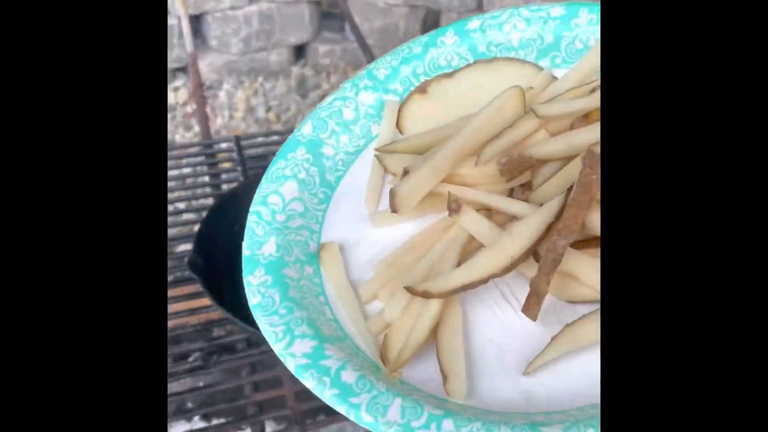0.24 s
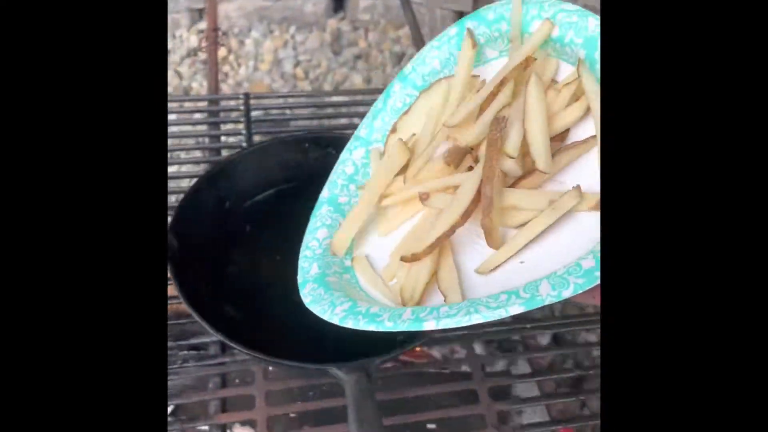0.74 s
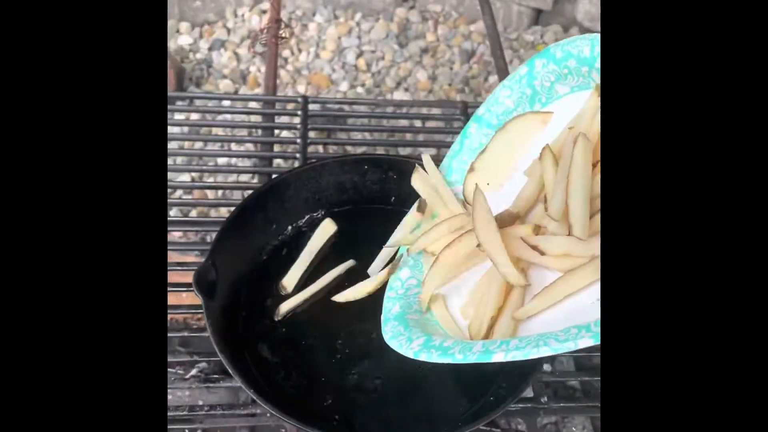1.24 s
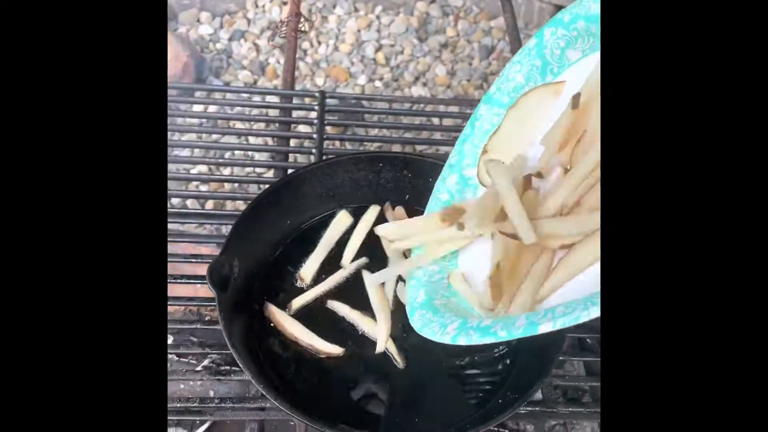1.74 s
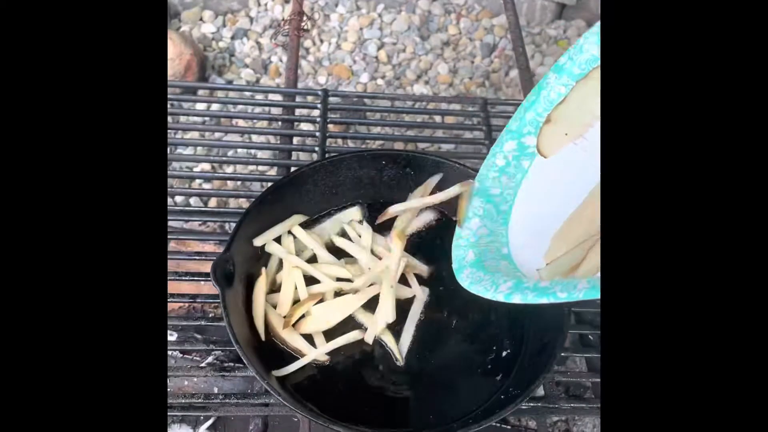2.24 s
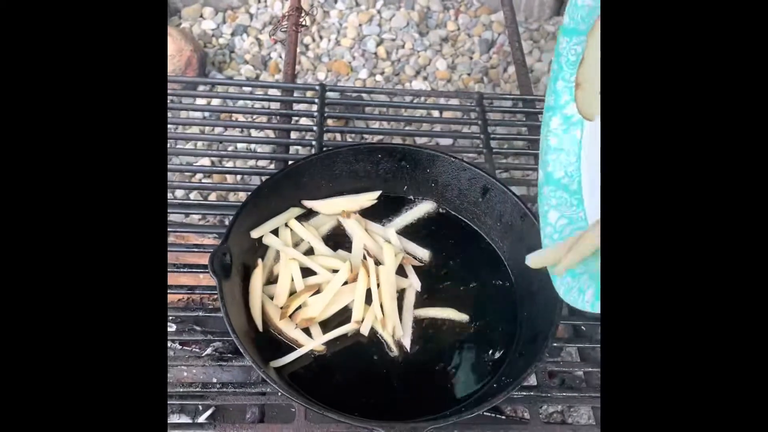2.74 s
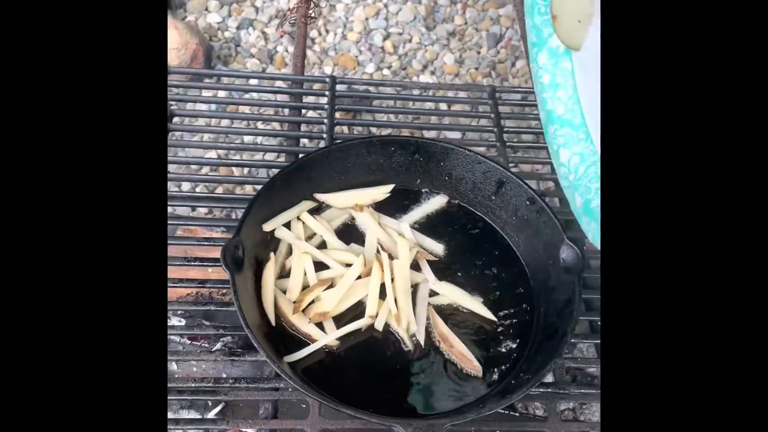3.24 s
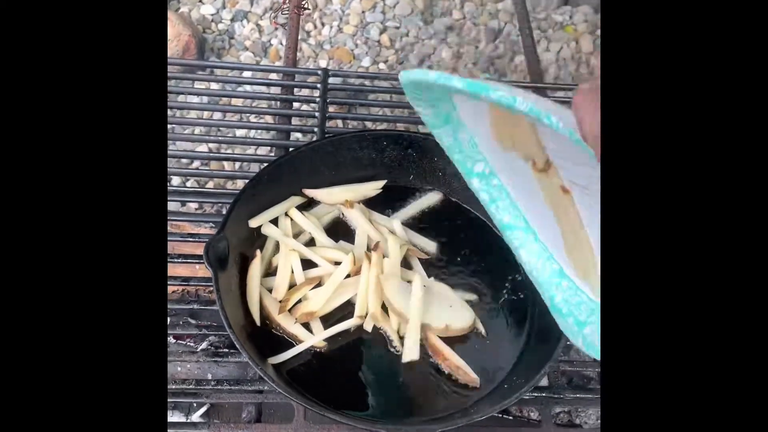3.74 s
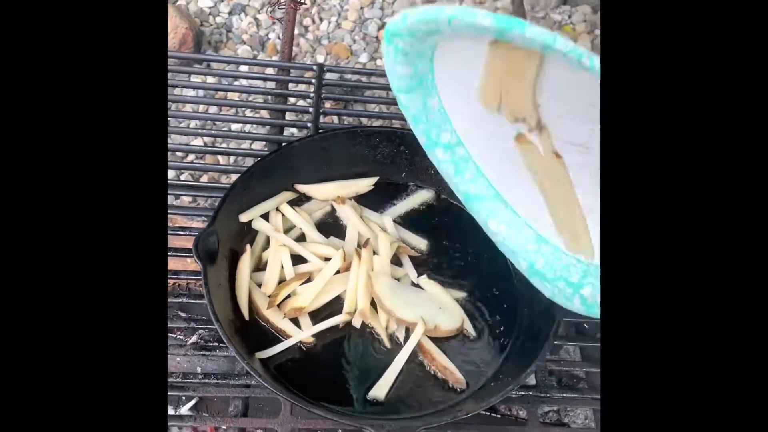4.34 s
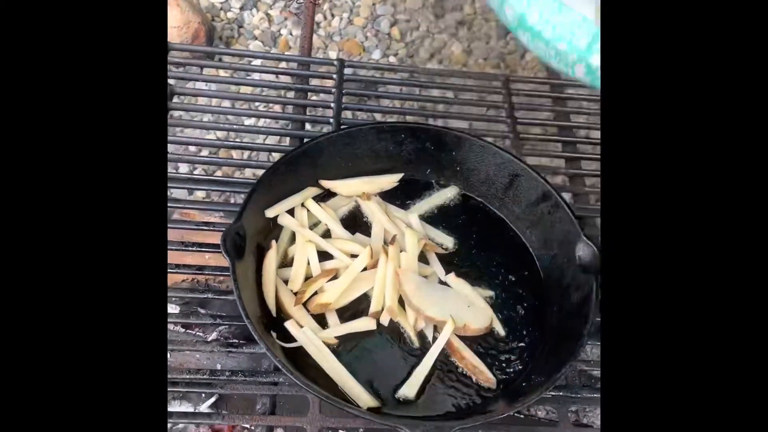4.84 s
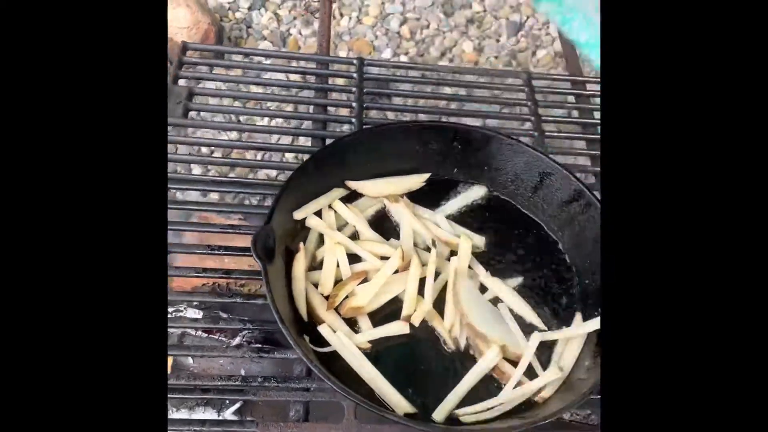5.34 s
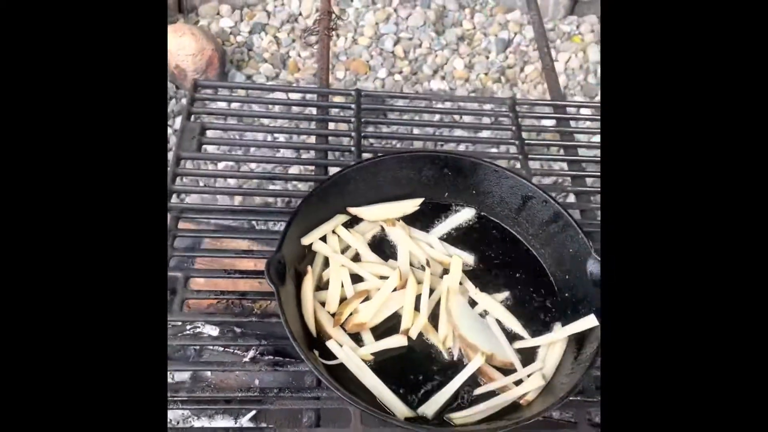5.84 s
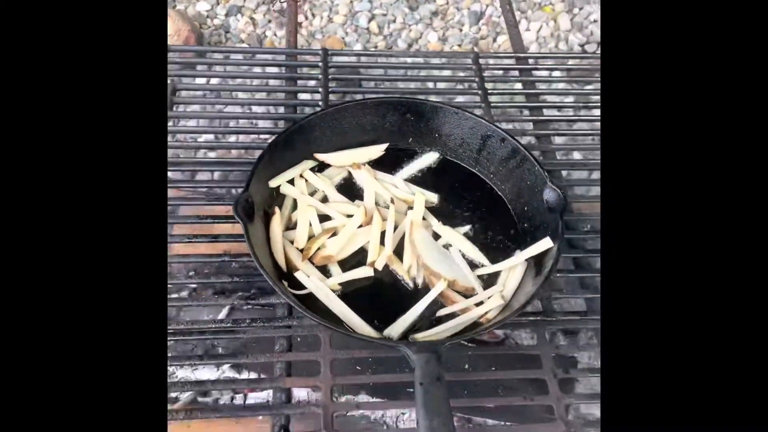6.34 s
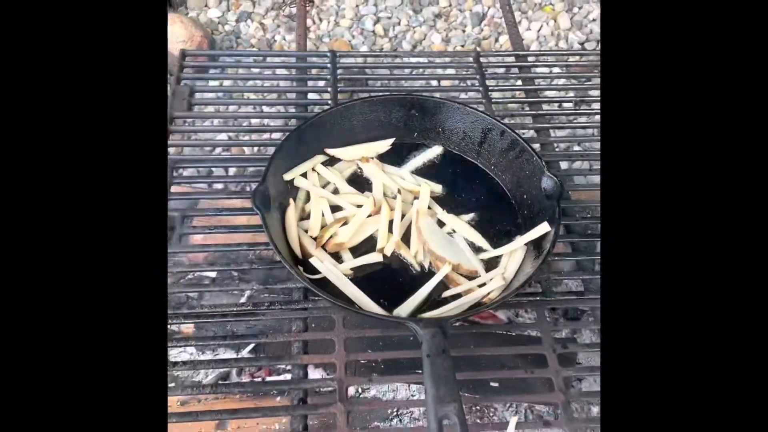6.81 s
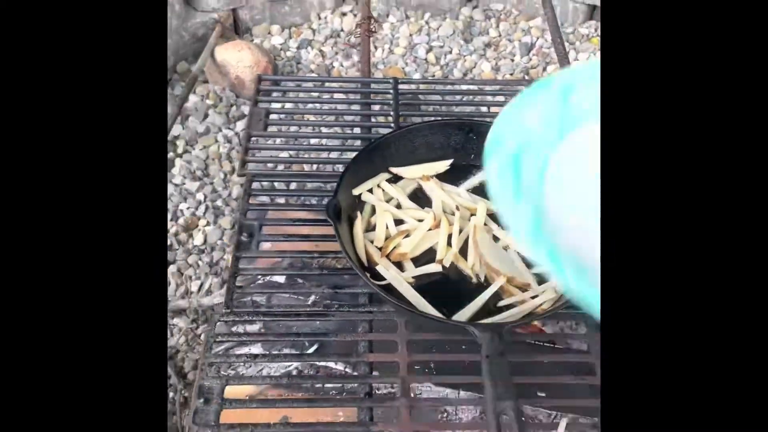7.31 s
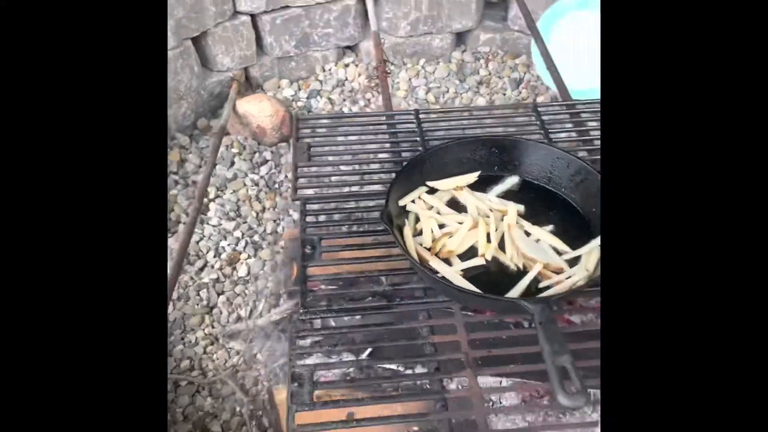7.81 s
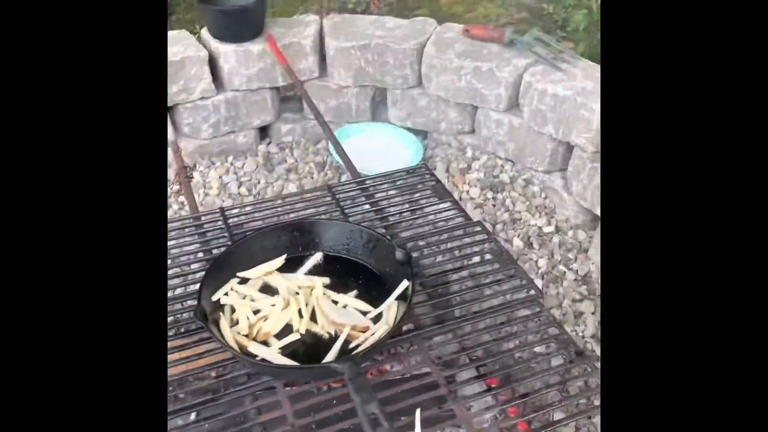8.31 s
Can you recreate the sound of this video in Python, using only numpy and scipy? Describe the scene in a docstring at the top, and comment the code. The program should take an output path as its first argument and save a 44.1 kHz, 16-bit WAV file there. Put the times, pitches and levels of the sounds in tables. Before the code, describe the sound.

Close sizzling and popping oil as damp fries tumble into a pan, followed by sharp plate knocks, faint wind and a distant engine drone.

```python
"""Fries into hot campfire oil

Raw fries slide off a paper plate into an iron skillet, outdoors; the oil spits, then sizzles densely.
The plate is tapped to free the last fries, knocks the pan and is tossed aside.
Oil is built from random bubble bursts, knocks from clicks, chirps and rattles, pats and scrapes from noise.
A far engine of three tones drones, and filtered noise makes the wind on a close two-port microphone."""
import sys
import numpy as np
from scipy import signal
from scipy.fft import rfft, irfft, next_fast_len
from scipy.io import wavfile
from scipy.ndimage import uniform_filter1d

SR = 44100
rng = np.random.default_rng(int(sys.argv[2]) if len(sys.argv) > 2 else 0)


def master(y):
    """Save y as 16-bit WAV."""
    cut = np.clip(np.atleast_2d(y).T, -1, 1)
    pcm = np.round(cut * 32767)  # scale
    wavfile.write(sys.argv[1], SR, pcm.astype(np.int16))


N = 377844
TIME = np.arange(N) / SR


def amp(db):
    """Decibels to gain."""
    return 10 ** (np.asarray(db) / 20)


def decibels(power):
    """Power to decibels."""
    return 10 * np.log10(power + 1e-20)


def evened(x):
    """Scaled to rms 1."""
    return x / np.sqrt(np.mean(x ** 2) + 1e-20)


def peaked(x):
    """Scaled to peak 1."""
    return x / (abs(x).max() + 1e-20)


def read(points, hz):
    """A spectrum joined by straight lines over log frequency."""
    f, value = np.transpose(points)
    return np.interp(np.log(hz + 1), np.log(f + 1), value)


def follow(rows):
    """Each column of a curve at every sample."""
    s, *columns = np.transpose(rows)
    return [np.interp(TIME, s, column) for column in columns]


def since(s):
    """Seconds since time s, zero before it."""
    return np.maximum(TIME - s, 0)


def add(mix, s, sound):
    """Mixes a sound in at time s."""
    part = mix[max(round(s * SR), 0):][:len(sound)]
    part += sound[:len(part)]


def impulse(spectrum, tilt_db=0, size=4096):
    """The causal click that has this spectrum, tilted in dB per octave."""
    hz = abs(np.fft.fftfreq(size, 1 / SR))
    gain_db = read(spectrum, hz) + tilt_db * np.log2(hz / 1000 + .5)
    log_gain = np.log(amp(gain_db))
    # the Hilbert transform gives the phase that starts the click at once
    return np.fft.ifft(np.exp(np.conj(signal.hilbert(log_gain)))).real


def coloured(x, spectrum, tilt_db=0):
    """A sound passed through a spectrum, at rms 1."""
    return evened(signal.oaconvolve(x, impulse(spectrum, tilt_db))[:len(x)])


def band(hz):
    """The broad spectrum of damp things meeting, strongest at hz."""
    return [(hz / 10, -30), (hz / 2.0, -11), (hz, 0), (hz * 1.39, -9), (hz * 10, -32)]


def drift(rate_hz):
    """Random wandering of rms 1, which fades out above rate_hz."""
    size = next_fast_len(N)
    hz = np.fft.rfftfreq(size, 1 / SR)
    return evened(irfft(rfft(rng.standard_normal(size)) / (1 + (hz / rate_hz) ** 2), size)[:N])


def swell(u):
    """A short smooth rise and fall that reaches 1 at u = 1."""
    return (u * np.exp(1 - u)) ** 2


def bend(t, hz, steep):
    """Bending wave, high pitches first: a falling chirp, loudest at hz; less steep ends fall deeper."""
    cycles = 2.08  # the peak comes this many periods of hz after the blow
    u = t * hz / cycles
    envelope = u ** 2 * np.exp(2 * (1 - u ** steep) / steep)
    return envelope * np.sin(2 * np.pi * cycles * 4 * u / (1 + u))


# The far engine's three tones fade in and out on the way.
# Each row: time in seconds, then the level of the first, second and third tone in dB.
ENGINE_TONES = [(0, -56.5, -60, -63), (.4, -47, -54.5, -62.5), (1.2, -46.5, -58, -60),
                (1.8, -44, -65, -76.5), (2.7, -40.5, -57, -73), (4, -40.5, -55.5, -62),
                (5, -40.5, -68, -104), (6, -45, -52, -81), (6.8, -46.5, -55.5, -82), (7.5, -46, -67, -102),
                (8.57, -49, -64, -64)]
# The engine slowly sags. Each row: time in seconds, firing rate in Hz.
ENGINE_RATE = [(0, 76.9), (1.3, 76.4), (2.8, 75.2), (3.8, 75.7), (5, 74.9), (6.7, 74.3), (8.57, 73.4)]


def engine():
    """A far drone: three multiples of the firing rate that waver on their way through the air."""
    waver_db, waver_hz = 1.3, 2.2
    hz, = follow(ENGINE_RATE)
    turns = np.cumsum(hz + 0.15 * drift(1.44)) / SR
    out = np.zeros(N)
    for multiple, db in enumerate(follow(ENGINE_TONES), 1):
        out += amp(db + waver_db * drift(waver_hz)) * np.sin(2 * np.pi * multiple * turns)
    return np.sqrt(2) * out


# Gusts on the microphone. Each row: middle in seconds, length in seconds, level in dB before a trim.
GUSTS = [(1.937, 2.3, -52.5), (3.314, 0.4, -49), (4.333, 0.59, -40), (4.887, 0.48, -45), (5.435, 0.31, -44),
         (7.194, 1.4, -49), (8.375, 0.11, -44)]


def breeze():
    """Wind level in dB: smooth gusts over a light breeze, all of it lumpy with turbulence."""
    breeze_db, rise_s = -51.5, 0.64  # the light wind between gusts takes a while to get up
    lumps_db, lumps_hz = 2.5, 13
    steady = amp(breeze_db) * (1 - np.exp(-TIME / rise_s))
    gusts = [amp(db) * np.exp(-(2 * (TIME - s) / length) ** 2) for s, length, db in GUSTS]
    return decibels(steady ** 2 + np.square(gusts).sum(0)) + lumps_db * drift(lumps_hz)


# Tone of the wind, then of the yard. Each row: frequency in Hz, relative strength in dB.
WIND_TONE = [(15, -77), (25, -56), (37, 2), (60, 5.5), (80, 7), (110, -1.5), (180, -17.5), (300, -27),
             (600, -38.5), (2000, -67)]
YARD_TONE = [(20, -29), (40, 2.5), (120, 6.5), (220, 1), (350, -3.5), (800, -10.5), (2000, -17),
             (5000, -23.5), (15000, -101)]
# How loud the part of the yard shared by both ports is. Each row: time in seconds, level in dB.
YARD_LEVEL = [(0, -59.5), (1.5, -57.5), (4, -57), (7, -59.5), (7.5, -68.5), (7.9, -55), (8.57, -61.5)]


def air():
    """Wind rumble and the hush of the yard: filtered noise, partly shared by the two ports."""
    gust_db = breeze()
    yard_db, = follow(YARD_LEVEL)
    # first a shared noise, then one for each port
    wind = np.array([coloured(rng.standard_normal(N), WIND_TONE) for _ in range(3)])
    yard = np.array([coloured(rng.standard_normal(N), YARD_TONE) for _ in range(3)])
    wind_sound = amp(gust_db + 1.0) * (wind[0] + 0.99 * wind[1:])
    return wind_sound + amp(yard_db) * (yard[0] + 1.13 * yard[1:])


# Low thumps: handling of the microphone, and the deep end of the hardest plate blow.
# Each row: start in seconds, peak level in dB.
THUMPS = [(3.111, -30), (5.124, -24), (6.451, -28), (6.657, -29.5), (8.365, -21.5)]


def thumps():
    """Handling of the microphone, and the hardest plate blow's deep end: a few low, damped cycles."""
    out, t = np.zeros(N), TIME[:8000]
    thump = peaked(t * np.exp(-t / 0.009) * np.sin(2 * np.pi * 62 * t))
    for s, db in THUMPS:
        add(out, s, amp(db) * thump)
    return out


# Blows that ring the skillet. Each row: start in seconds, level in dB before a trim.
CLANGS = [(1.035, -43.5), (1.26, -52), (1.319, -39.5), (1.371, -43), (1.405, -48.5), (2.071, -47),
          (2.886, -31.5), (5.36, -44)]
# The skillet's own tones. Each row: pitch in Hz, relative level in dB, seconds to fall by 60 dB.
IRON_TONES = [(686, 5, 0.19), (1266, 5, 0.12), (1982, 5.5, 0.085), (3000, 5.5, 0.057)]
# Single lingering rings of grate bars and, near 1.28 kHz, of the skillet.
# Each row: start in seconds, level in dB, pitch in Hz, seconds to fall by 60 dB.
SINGLE_RINGS = [(4.081, -35, 2790, 0.28), (4.266, -46, 2440, 0.79), (4.266, -40, 2760, 0.61),
                (4.08, -40, 4743, 0.25), (4.268, -46, 4640, 0.54), (4.265, -40, 5130, 0.32),
                (5.122, -54.5, 1057, 3.4), (5.139, -32.5, 1290, 0.15), (5.139, -35, 1272, 0.11)]


def skillet(boil, spit, load):
    """Oil-damped cast iron rings under blows and hums under bubbles; single rings linger, some of the grate."""
    out, t = np.zeros(N), TIME[:SR]
    ring = peaked(sum(amp(db - 60 * t / t60) * np.sin(2 * np.pi * hz * t) for hz, db, t60 in IRON_TONES))
    for s, db in CLANGS:
        add(out, s, amp(db + 7.5) * ring)
    for s, db, hz, t60 in SINGLE_RINGS:
        add(out, s, amp(db - 60 * t / t60) * np.sin(2 * np.pi * hz * t))
    hum_db = 3.5 + decibels(boil + amp(-6.5) ** 2 * spit)
    damping = 1 + load / amp(-56.5) ** 2  # a load of -56.5 dB halves the hum
    hum = signal.oaconvolve(rng.standard_normal(N), ring * np.exp(-t / 0.035))[:N]
    return out + amp(hum_db) / damping * evened(hum)


# Blows on the plate. Each row: start in seconds, crack peak in dB, crack and rattle tilt in dB per octave,
# snap pitch in Hz, snap peak in dB, bending wave pitch in Hz, bending wave level in dB,
# how steeply that wave ends, flex pitch in Hz, flex level in dB, rattle peak in dB, rattle decay in seconds.
KNOCKS = [(3.7033, -38, 0, 2450, -17.5, 720, -29, 0.98, 404, -36, -20, 0.015),
          (3.8925, -31, -2, 2350, -23, 693, -31.5, 0.89, 435, -28, -19, 0.013),
          (4.0806, -5.5, 0.5, 2550, -10, 905, -28.5, 0.76, 412, -28.5, -16, 0.02),
          (4.2677, -3, 0, 4570, -11.5, 920, -33, 1.7, 420, -28, -15.5, 0.02),
          (4.4468, -6.5, -2, 4630, -4.5, 760, -24, 1.4, 396, -31, -13.5, 0.019),
          (4.504, -38, -3.5, 1500, -39, 714, -32, 2, 510, -34, -27.5, 0.013),
          (5.1206, -6.5, 5.5, 2300, -11, 895, 1, 4.5, 792, -6, -11, 0.0086),
          (5.125, -6.5, -6, 2520, 1, 1040, -9, 4.1, 166, -19, 1, 0.0031),
          (7.7194, -29, -1, 2360, -25.5, 512, -22, 0.59, 214.4, -24.5, -24.5, 0.023)]
# Tone of the crack and the rattle. Each row: frequency in Hz, relative strength in dB.
CRACK_TONE = [(100, 2.5), (330, 0), (480, -17), (620, 7), (850, 1.5), (1100, -19), (1700, 2), (2300, 3),
              (3000, 4.5), (4600, 3), (7000, 2), (10000, -15.5), (16000, -17.5)]
# Ways the plate flexes. Each row: multiple of the flex pitch, relative level in dB.
FLEX_TONES = [(1.002, 10.5), (1.34, 7.5), (2.05, -2), (3.1, 7), (3.7, -0.5)]


def flexing(t, pitch_hz, decay_s):
    """The damp card wobbles for only a few cycles, so its stiffer flexes die sooner."""
    flex = np.zeros(len(t))
    for multiple, db in FLEX_TONES:
        hz = multiple * pitch_hz
        life_s = min(3 / hz, decay_s)
        flex += amp(db) * np.sin(2 * np.pi * hz * t) * np.exp(-t / life_s)
    flex *= 1 - np.exp(-t / 0.0024)
    u = t / 0.00085  # the whole plate also pushes one low puff of air
    puff = peaked(u * (2 - u) * np.exp(-u))
    return peaked(flex) + amp(-8) * puff


def rattling(t, tilt_db, decay_s):
    """The card rattles unevenly; the bright part dies before the dull part."""
    unevenness = evened(uniform_filter1d(rng.standard_normal(len(t)), size=90))
    rattle = rng.standard_normal(len(t)) * amp(4 * unevenness)
    bright = coloured(rattle * np.exp(-t / decay_s), CRACK_TONE, tilt_db)
    dull = coloured(rattle * np.exp(-t / (1.45 * decay_s)), CRACK_TONE, tilt_db - 3)
    return peaked(bright + .5 * dull)


def plate():
    """Each blow is a crack, a short snap, a falling bending wave, a damped flex and a rattle."""
    out, t = np.zeros(N), TIME[:6000]
    for (s, crack_db, tilt_db, snap_hz, snap_db, bend_hz, bend_db, steep,
         flex_hz, flex_db, rattle_db, decay_s) in KNOCKS:
        crack = 0.34 * rng.standard_normal(len(t)) * np.exp(-t / 0.00095)
        crack[0] = 1
        snap = np.sin(2 * np.pi * snap_hz * t) * swell(t / 0.0003)
        blow = amp(crack_db) * peaked(coloured(crack, CRACK_TONE, tilt_db))
        blow += amp(snap_db) * snap
        blow += amp(bend_db) * bend(t, bend_hz, steep)
        blow += amp(rattle_db) * rattling(t, tilt_db, decay_s)
        blow += amp(flex_db) * flexing(t, flex_hz, decay_s)
        add(out, s, blow)
    return out


# Short squeaks of the card as it shifts in the grip. Each row: start in seconds, length in seconds,
# level in dB before doubling, first pitch in Hz, last pitch in Hz.
RUBS = [(0.055, 0.22, -70, 3140, 2470), (3.721, 0.015, -46.5, 1610, 2510), (3.893, 0.0062, -30, 2440, 2300),
        (3.9, 0.0086, -34.5, 1830, 1750), (8.029, 0.024, -50.5, 2290, 2070)]


def rub():
    """Thin squeaks, rough in pitch, that swell, glide and fade."""
    out, jitter_hz = np.zeros(N), 170 * drift(320)
    for s, length, db, from_hz, to_hz in RUBS:
        now = (TIME >= s) & (TIME < s + length)
        u = (TIME[now] - s) / length
        hz = from_hz + (to_hz - from_hz) * u ** 2 + jitter_hz[now]
        envelope = 2 * np.sqrt(abs(np.sin(np.pi * u)))
        add(out, s, amp(db) * envelope * np.sin(2 * np.pi * np.cumsum(hz) / SR))
    return out


# Dull pats of fries and plate. Each row: start in seconds, level in dB before a trim, pitch in Hz.
TUMBLES = [(0.462, -41.5, 890), (0.714, -28, 1500), (0.805, -38, 950), (0.829, -44, 2500),
           (0.882, -30, 2600), (1.035, -29.5, 1150), (1.066, -30.5, 980), (1.0918, -25.5, 2220),
           (1.487, -39, 730), (1.634, -26.5, 3000), (1.669, -23.5, 1900), (1.681, -26, 1160),
           (1.796, -26, 1240), (1.801, -27, 900), (1.8135, -26, 980), (1.8355, -21, 1210),
           (1.951, -29, 1190), (1.963, -25.5, 1210), (1.9774, -19, 1050), (1.991, -27, 850),
           (2.002, -27, 650), (2.0019, -20.5, 3340), (2.071, -27.5, 1000), (2.513, -32, 850),
           (2.734, -26.5, 490), (3.279, -32, 1170), (3.9066, -28.5, 1950), (4.274, -19.5, 750),
           (4.463, -18, 1720), (4.463, -20, 650), (4.472, -22, 1400), (6.157, -29.5, 710),
           (7.249, -39.5, 750), (7.708, -28, 880), (7.729, -22, 1640), (7.946, -33, 415), (8.057, -31, 463)]
# Scrapes of fries and plate, and rough tails after two plate blows. Each row: middle in seconds,
# length in seconds, level in dB before the fade in and out, strongest frequency in Hz.
SCRAPES = [(0.338, 0.031, -55, 2120), (0.392, 0.15, -51, 600), (0.724, 0.071, -50.5, 2470),
           (0.782, 0.27, -52.5, 870), (1.023, 0.21, -56.5, 1160), (1.682, 0.088, -45, 980),
           (1.815, 0.16, -46.5, 850), (1.807, 0.027, -39, 815), (1.965, 0.13, -51.5, 616),
           (5.153, 0.055, -40, 855), (7.751, 0.035, -44.5, 600), (7.927, 0.045, -48, 2230),
           (8.059, 0.036, -44.5, 1950)]


def pats_and_scrapes():
    """Damp fries and plate pat dully; uneven noise makes their scrapes and two blows' rough tails."""
    out, t = np.zeros(N), TIME[:2048]
    for s, db, hz in TUMBLES:
        settle = peaked(coloured(rng.standard_normal(len(t)) * np.exp(-t / 0.0058), band(hz)))
        add(out, s, amp(db - 8.5) * (bend(t, hz, 1.3) + amp(3.5) * settle))
    rough = rng.standard_normal(N) * amp(3 * drift(120))
    for s, length, db, hz in SCRAPES:
        near = abs(TIME - s) < length
        envelope = np.exp(-(2 * (TIME[near] - s) / length) ** 2)
        add(out, s - length, amp(db) * coloured(rough[near], band(hz)) * envelope)
    return out


# Steam squeezing out under a fry. Each row: start in seconds, peak level in dB, pitch in Hz.
SQUEAKS = [(1.019, -26.5, 8000), (2.053, -26, 5760), (2.123, -21.5, 6200), (3.221, -30, 8800),
           (3.952, -27, 5600), (5.352, -20.5, 5800), (5.731, -23, 5130), (6.976, -21.5, 4900)]


def squeaks():
    """Steam flutters out as noise in a narrow band for a few milliseconds."""
    out, t = np.zeros(N), TIME[:2048]
    for s, db, hz in SQUEAKS:
        puff = rng.standard_normal(len(t)) * np.exp(-t / 0.009)
        ring = np.exp(-t / 0.00029) * np.cos(2 * np.pi * hz * t)
        add(out, s, amp(db) * peaked(signal.fftconvolve(puff, ring)[:len(t)]))
    return out


# Single loud pops of oil.
# Each row: start in seconds, level in dB before a trim, pitch of the bursting bubble in Hz.
POPS = [(1.0977, -21, 5740), (1.1518, -24.5, 9800), (1.237, -17, 10300), (1.2685, -14.5, 9000),
        (1.3292, -15.5, 9400), (1.342, -13, 9700), (1.369, -21, 10000), (1.387, -28, 10600),
        (1.4415, -27, 6200), (1.476, -18, 6340), (1.5633, -25, 10600), (1.8333, -17, 9900),
        (1.9551, -19, 10000), (2.1182, -14.5, 5820), (2.125, -18, 9150), (2.2473, -22, 10200),
        (2.2807, -16.5, 9600), (2.353, -17, 10200), (2.358, -21, 9900), (2.4, -22.5, 10400),
        (2.446, -22, 9600), (2.4903, -23.5, 9400), (3.6458, -22, 5930), (3.8353, -24.5, 9400),
        (4.339, -19.5, 8900), (5.308, -22, 9000), (5.335, -26, 4000), (5.395, -21, 6000),
        (5.351, -30, 6200), (5.4392, -17.5, 9060), (5.5611, -17, 10100), (5.617, -19.5, 9800),
        (5.7312, -25, 3500), (5.8326, -21, 9160), (5.9214, -18.5, 5200), (6.1578, -20, 9700),
        (6.389, -20.5, 9050), (6.5239, -29, 9000), (6.5862, -22, 5860), (6.594, -22, 4080),
        (6.708, -19.5, 5360), (6.9767, -40, 3700), (7.1005, -21.5, 8100), (7.149, -28, 6700)]
# Pops grow duller as the pan fills. Each row: time in seconds, tilt in dB per octave.
POP_TILT = [(1.2, 3.5), (3.6, -4.5), (6.7, -3.5)]
# Tone of snapping droplets. Each row: frequency in Hz, relative strength in dB.
SNAP_TONE = [(300, -24.5), (1000, -18), (4000, -3), (5500, 3), (8000, 8), (11000, 3.5), (13300, 0),
             (15700, 8)]


def pops():
    """A drop of water explodes in one sharp click, a brief bubble ring and a little spray."""
    out, t = np.zeros((2, N)), TIME[:1024]
    lag_s = 0.000025  # pops come from all over the pan, so one port may hear them first
    for s, db, hz in POPS:
        spray = 0.13 * rng.standard_normal(len(t)) * np.exp(-t / 0.0027)
        spray[0] = 1  # the click
        tilt_db = np.interp(s, *np.transpose(POP_TILT))
        ring = np.sin(2 * np.pi * hz * t) * np.exp(-t / 0.00079)
        pop = amp(db + 7.0) * (peaked(coloured(spray, SNAP_TONE, tilt_db)) + 0.25 * ring)
        add(out[0], s, pop)
        add(out[1], s + lag_s * rng.uniform(-1, 1), pop)
    return out


# Handfuls of fries reaching the oil. Each row: start in seconds, boiling they bring in dB,
# spitting of their surface water in dB.
BATCHES = [(0.678, -65, -75), (1.02, -57.5, -70), (1.22, -62, -68), (1.307, -58.5, -39.5),
           (1.768, -50.5, -42.5), (1.979, -61, -39.5), (2.26, -62, -40), (3.65, -58.5, -52),
           (5.311, -52, -38.5)]
# The microphone backs away from the pan. Each row: time in seconds, distance in metres.
DISTANCE = [(0, 0.46), (6.2, 0.41), (7.5, 0.65), (8.57, 0.79)]


def frying():
    """Powers of boiling, flash and spitting at the microphone, and the load of fries in the pan."""
    wet_s = 0.0023  # a fry is wetted this fast
    spit_s, flash_s = 0.065, 0.21  # its surface water spits, then flashes off as fine fizz
    build_s, dry_s = 0.04, 6.54  # boiling builds up and slowly dies away
    linger_db, linger_s = -14.5, 0.79  # droplets thrown into the oil go on spitting
    boil, flash, spit, load = np.zeros((4, N))
    for s, db, spit_db in BATCHES:
        age, amount = since(s), amp(db) ** 2
        wet = 1 - np.exp(-age / wet_s)
        boil += amount * (1 - np.exp(-age / build_s)) * np.exp(-age / dry_s)
        flash += amount * wet * np.exp(-age / flash_s)
        lingering = amp(linger_db) ** 2 * np.exp(-age / linger_s)
        spit += amp(spit_db) ** 2 * wet * (np.exp(-age / spit_s) + lingering)
        load += amount * wet
    metres, = follow(DISTANCE)
    near = (metres[0] / metres) ** 2
    return near * boil, near * flash, near * spit, load


def bursts(per_s, spread_db, cycles, count=8):
    """Bubbles burst at random times and sizes, each a short damped ring at one of a few pitches."""
    t, out = TIME[:512], np.zeros(N)
    size = amp(spread_db * np.minimum(rng.exponential(1, N), 4.5)) * rng.choice([-1, 1], N)
    size *= rng.random(N) < per_s / SR
    kind = rng.integers(0, count, N)
    for k, hz in enumerate(np.linspace(900, 16000, count)):
        ring = np.exp(-t * hz / cycles) * np.cos(2 * np.pi * hz * t)
        out += signal.oaconvolve(size * (kind == k), ring / np.linalg.norm(ring))[:N]
    return out


# Tone of the fine fizz, then of the coarser bubbling. Each row: frequency in Hz, relative strength in dB.
FIZZ_TONE = [(1500, -17.5), (4000, -2.5), (6000, -0.5), (7500, 5.5), (9500, 0.5), (11500, -1), (13300, -5),
             (15700, 3.5)]
BUBBLING_TONE = [(250, -29), (500, -42), (750, -7.5), (1500, -2.5), (2200, 6), (3700, 5), (4500, 2),
                 (5100, 6.5), (6200, 6.5), (8000, -0.5), (13000, -39)]


def oil(boil, flash, spit, load):
    """Fizz and bubbling in flurries, clumped droplet crackle, ringing bubbles; a full pan evens out."""
    idle_db = -74  # the hot oil alone
    fizz_db = decibels(amp(-1.0) ** 2 * boil + amp(3.0) ** 2 * flash + amp(idle_db - 4.0) ** 2)
    bubbling_db = decibels(boil + amp(idle_db) ** 2)
    crackle_db = decibels(spit + amp(-17) ** 2 * boil)
    flurry = drift(8.2)
    # the first few fries sputter; a load of -51.5 dB halves this
    sputter_db = 5.5 / (1 + load / amp(-51.5) ** 2) * (drift(58) - .5)
    flutter_db = 1.5 * drift(35)  # bubbles break out in quick little runs
    clump_db = 3 * drift(48)

    fizz = coloured(bursts(per_s=8300, spread_db=0.0, cycles=0.36), FIZZ_TONE)
    fizz *= amp(fizz_db + 8.0 + 1.15 * flurry + sputter_db)
    bubbling = coloured(bursts(per_s=7000, spread_db=-0.3, cycles=0.31), BUBBLING_TONE)
    bubbling *= amp(bubbling_db - 0.34 + 0.39 * flurry + flutter_db)
    crackle = coloured(bursts(per_s=340, spread_db=2.8, cycles=0.6), SNAP_TONE)
    crackle *= amp(crackle_db + 4.5 + clump_db + sputter_db)
    ringing = coloured(bursts(per_s=260, spread_db=2.6, cycles=2.5), BUBBLING_TONE)
    ringing *= amp(bubbling_db - 7)
    return fizz + bubbling + crackle + ringing


# How the two microphone ports differ in timing.
# Each row: frequency in Hz, angle in radians by which left leads.
PORT_PHASE = [(0, 0), (400, -.1), (1000, -1.1), (1400, 0), (2000, .5), (2900, 2), (4300, 1.7), (4900, -.3),
              (6000, 1.1), (7000, 2.95), (8300, 3.3), (9300, 4.9), (10200, 6.25), (11700, 6.3),
              (12300, 6.8), (13200, 9.15), (14900, 9.6), (15700, 10.5)]
# How they differ in level. Each row: frequency in Hz, left minus right in dB.
PORT_BALANCE = [(330, 1), (600, -8), (1400, -7.5), (2100, -2.5), (3500, -5.5), (4600, -3), (5100, 2.5),
                (6200, 0)]
# Sound that differs between the ports. Each row: frequency in Hz, level in dB before a trim.
SCATTER = [(100, 4), (250, 5.5), (600, 0.5), (2000, -13), (3200, -16.5), (5500, -7), (7500, -66),
           (9500, -44), (11000, -0.5), (13000, -24), (15000, -10.5)]


def ports(spread, fixed):
    """The ports get unlike phase and level; sound from ever new spots differs more between them."""
    size = next_fast_len(N + SR // 4)
    hz = np.fft.rfftfreq(size, 1 / SR)
    side = np.array([[.5], [-.5]])
    direct = rfft(spread + fixed, size) * np.exp(1j * side * np.interp(hz, *np.transpose(PORT_PHASE)))
    wander = np.array([drift(560), drift(420)])
    # plate and pan stay in one spot, so little of their sound scatters
    moving = (spread + 0.25 * fixed) * wander
    scattered = rfft(moving, size) * amp(read(SCATTER, hz) - 1.0)
    return irfft((direct + scattered) * amp(side * read(PORT_BALANCE, hz)), size)[:, :N]


def scene():
    """Pan and plate close by, engine and wind behind."""
    background = engine() + air() + thumps()
    boil, flash, spit, load = frying()
    fixed = skillet(boil, spit, load) + plate()
    spread = rub() + pats_and_scrapes() + squeaks() + pops() + oil(boil, flash, spit, load)
    return background + ports(spread, fixed)


def record(dry):
    """A limiter ducks loud moments, recovers slowly and rounds off peaks; then the treble is cut off."""
    power_db = 10 * np.log10(abs(uniform_filter1d((dry ** 2).mean(0), size=200)) + 1e-12)
    recovery_db = 27 * TIME  # the held level falls by 27 dB per second
    held_db = np.maximum.accumulate(power_db + recovery_db) - recovery_db
    over_db = np.maximum(held_db + 10.5, 0)
    limited = np.tanh(dry * amp(-.55 * uniform_filter1d(over_db, size=100)))
    lowpass = signal.firwin(511, 15950, window=("kaiser", 9), fs=SR)
    return signal.oaconvolve(limited, lowpass[None], "same")


dry = scene()
out = record(dry)
master(out)
```